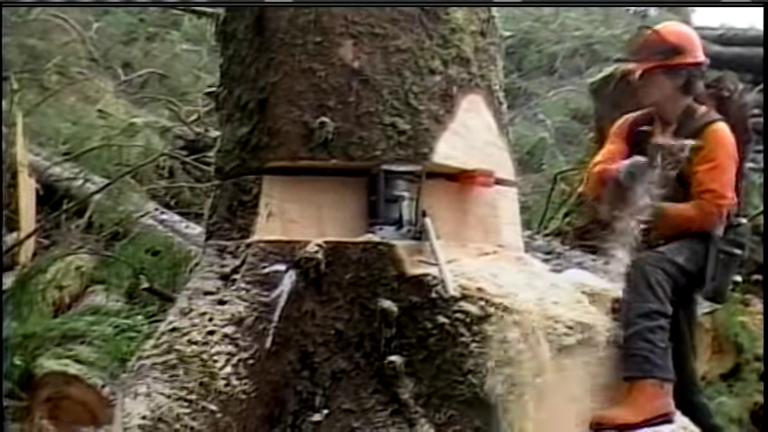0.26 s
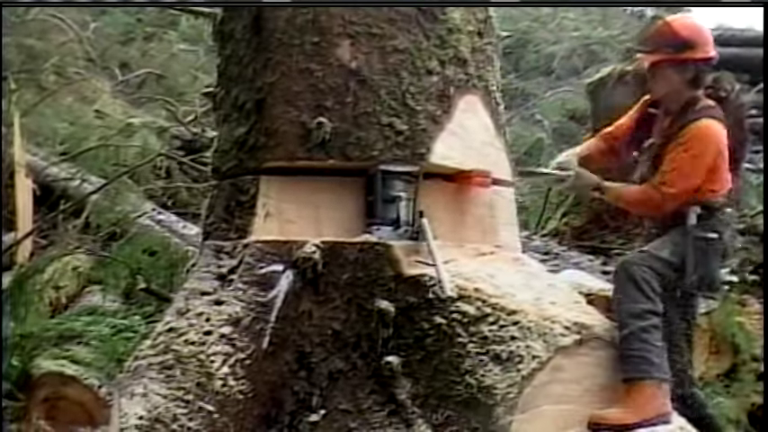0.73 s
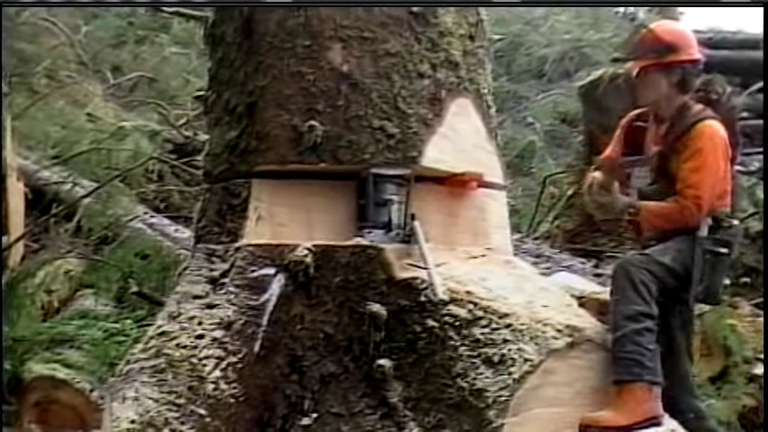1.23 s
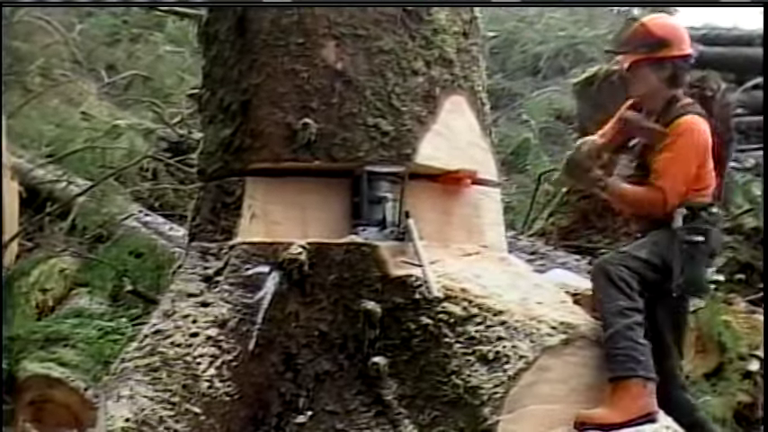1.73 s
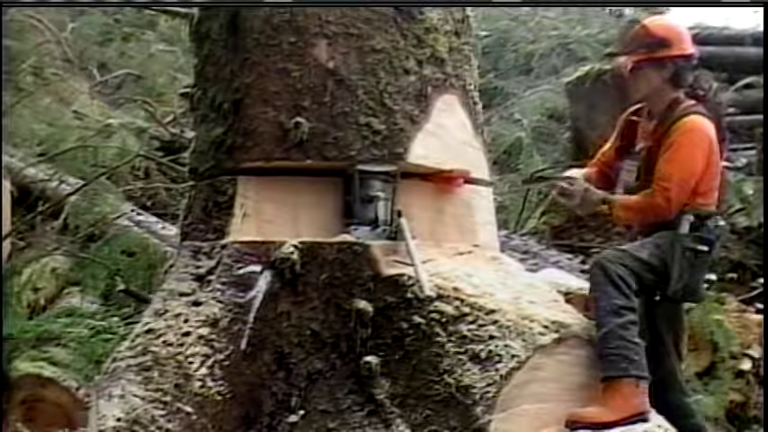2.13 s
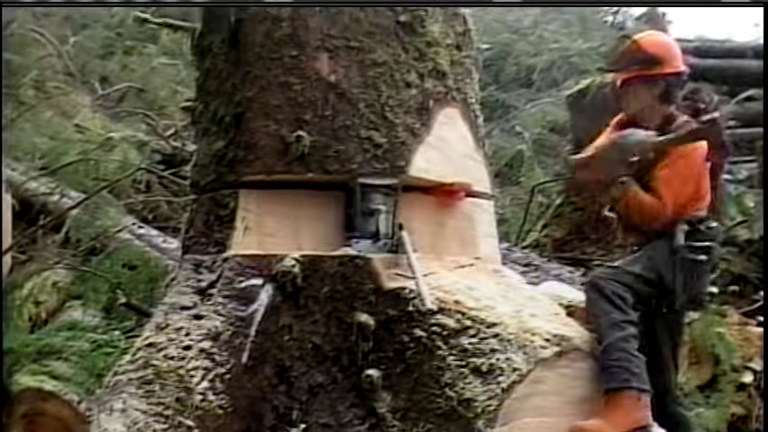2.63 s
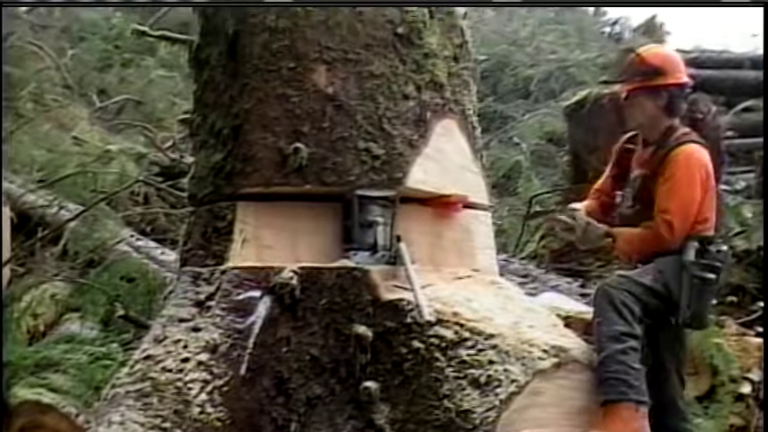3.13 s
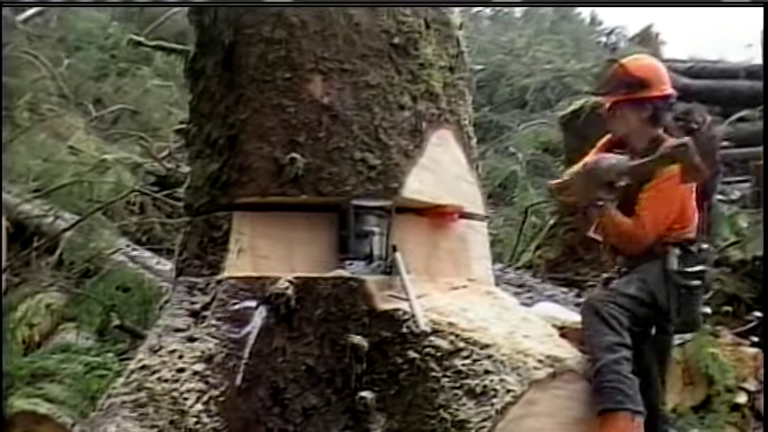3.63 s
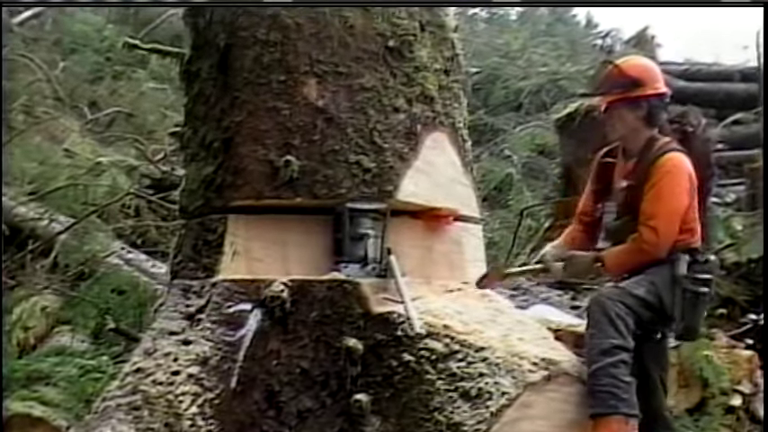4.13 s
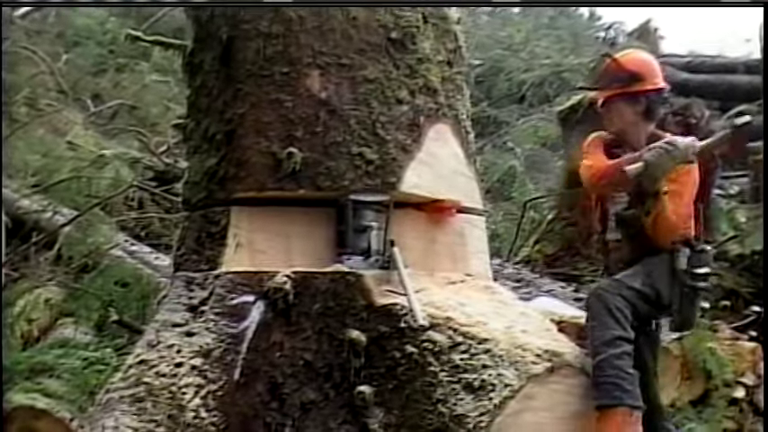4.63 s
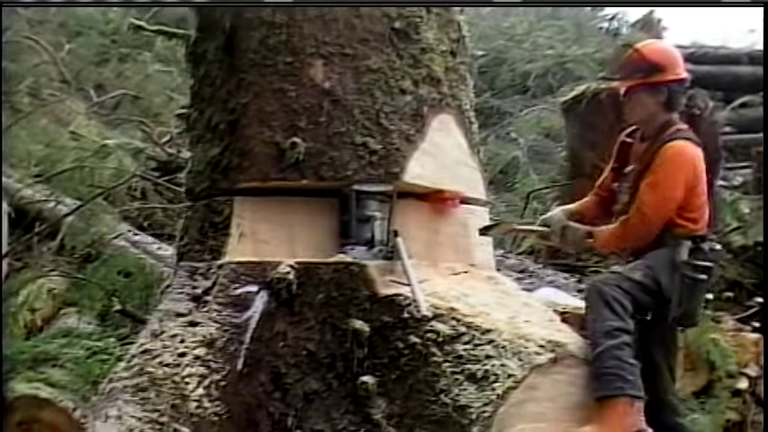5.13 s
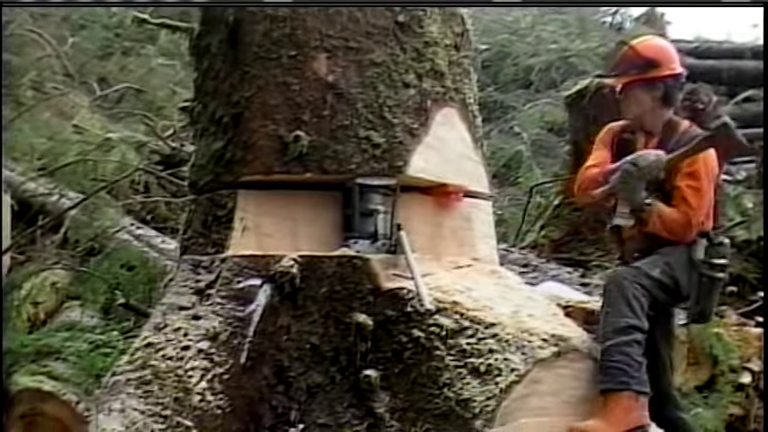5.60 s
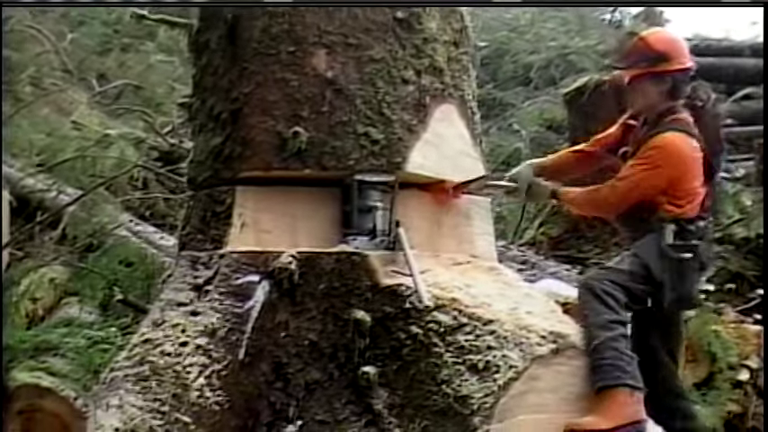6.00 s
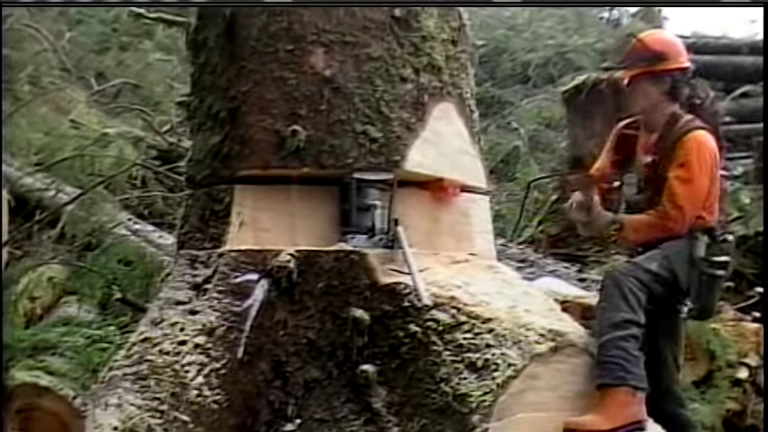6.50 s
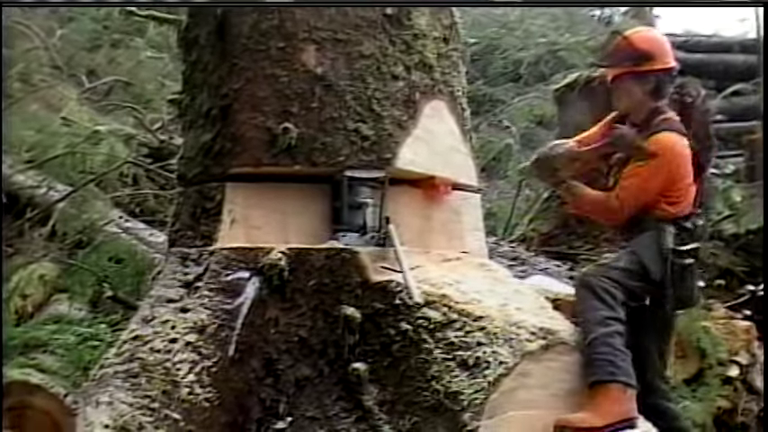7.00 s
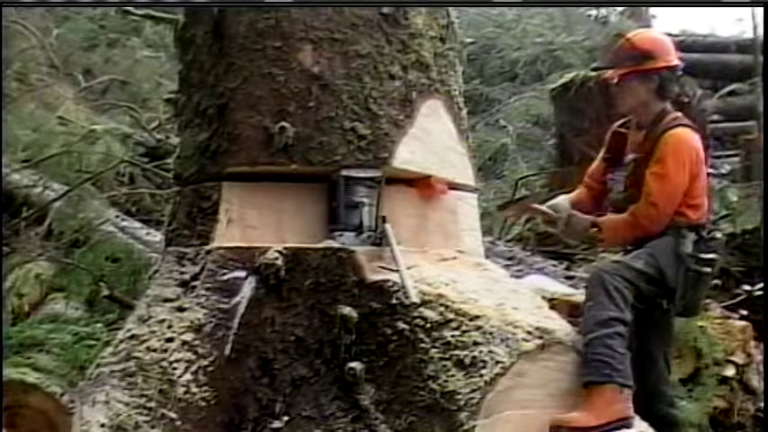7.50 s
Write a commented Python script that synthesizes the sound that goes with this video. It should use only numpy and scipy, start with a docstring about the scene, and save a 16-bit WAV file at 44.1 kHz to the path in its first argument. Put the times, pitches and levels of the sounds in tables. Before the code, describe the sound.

An axe strikes a wedge in a tree seven times, about once a second, each sharp, briefly ringing blow echoing through forest over faint hiss.

```python
"""Wedging a standing tree

An axe drives a wedge into a big tree, seven blows. Each impact excites damped modes of steel and wood,
and the forest scatters it back as a swelling wash. Gear and wood chips tick between the blows.
One microphone feeds the left track of a tape recorder, whose hiss, hum, whine and thumps lie on both."""
import sys
import numpy as np
from scipy import signal
from scipy.fft import rfft, irfft
from scipy.io import wavfile
from scipy.ndimage import uniform_filter1d

SR = 44100
rng = np.random.default_rng(int(sys.argv[2]) if len(sys.argv) > 2 else 0)


def transcribe(u):
    """Save the signal u as a 16-bit wav file named by the first command-line argument.

    u: samples, shape (n,) or (channels, n), limited to [-1, 1]; the rate is SR.
    q: integer samples, one column per channel.
    """
    v = np.clip(np.atleast_2d(u).T, -1, 1)
    q = np.round(v * 32767).astype(np.int16)
    wavfile.write(sys.argv[1], SR, q)


N = 341775


def gain_of(db):
    """Amplitude ratio of a level in decibels."""
    return 10 ** (np.asarray(db) / 20)


def spectrum_at(points, hz):
    """Interpolation of each column of a spectrum table over log frequency."""
    knots_hz, *columns = np.transpose(points)
    return np.array([np.interp(np.log(hz + 1), np.log(knots_hz + 1), column) for column in columns])


def add(mix, start_s, sound):
    """Superposition: a sound sums into the mix from start_s on."""
    part = mix[..., round(start_s * SR):][..., :sound.shape[-1]]
    part += sound[..., :part.shape[-1]]


def pulse(decay_s):
    """A heavily damped transient: one bump of peak 1 and a shallow overshoot."""
    u = np.arange(round(8 * decay_s * SR)) / (decay_s * SR)
    shape = u * np.exp(-u) * (1 - 0.37 * u)
    return shape / shape.max()


# Relative spectrum of forest air and tape noise: frequency_hz, left_db, right_db
HISS_SPECTRUM = [(10, -72, -70.5), (25, -73.5, -83), (49.5, -86.5, -89.5), (98, -88, -92), (239, -99, -100),
                 (497, -95, -113), (940, -94, -123), (1800, -96, -126), (4560, -100, -127),
                 (5800, -101, -126), (8800, -102, -124), (9950, -106, -127), (13200, -108, -126),
                 (15300, -108, -123), (15600, -107, -112), (15780, -106, -108), (15900, -122, -125),
                 (16400, -135, -138)]
# Likeness of the two tracks: frequency_hz, correlation
HISS_CORRELATION = [(30, 0.73), (130, 0.25), (300, 0.23), (600, 0)]


def hiss():
    """Partial coherence: air and tape noise whose bass fluctuates and is partly shared by the tracks."""
    frames, hz = N // 512 + 5, np.fft.rfftfreq(2048, 1 / SR)
    a, b, c, d = rng.standard_normal((frames, 1025, 4)).T
    correlation = spectrum_at(HISS_CORRELATION, hz).T
    left = a + 1j * b
    right = correlation * left + np.sqrt(1 - correlation ** 2) * (c + 1j * d)
    bass_drift_db = 2.1 * uniform_filter1d(rng.standard_normal(frames), size=4) * (hz < 90)[:, None]
    level_db = spectrum_at(HISS_SPECTRUM, hz)[:, :, None] + bass_drift_db + 15.5
    spectra = np.array([left, right]) * gain_of(level_db)
    return signal.istft(spectra, nperseg=2048, noverlap=1536)[1][:, :N]


FRAME_HZ = 29.9695


def frame_harmonic(number, left_db, right_db):
    """A pure tone phase-locked to the recorder's frame rate, at an rms level for each track."""
    t = np.arange(N) / SR - .0065
    return np.sqrt(2) * gain_of([[left_db], [right_db]]) * np.cos(2 * np.pi * number * FRAME_HZ * t)


# Partials of the recorder's hum: harmonic_number, left_db, right_db
HUM_PARTIALS = [(1, -78, -72), (2, -68, -71), (3, -71, -86), (4, -73, -74), (5, -101, -81), (6, -67, -79.5),
                (8, -75, -82.5), (9, -82.5, -94), (10, -83, -87.5), (11, -105, -96), (12, -78.5, -93),
                (14, -78, -94), (18, -78.5, -99), (20, -89, -100), (22, -88, -103), (24, -92, -105),
                (28, -91, -110)]


def hum():
    """Fourier synthesis: harmonics in phase sum to a train of downward pulses."""
    return -sum(frame_harmonic(*partial) for partial in HUM_PARTIALS)


# The line-scan tone, then its nearest sidebands going down: relative_level_db
WHINE_LEVELS = [-69, -85, -89, -84, -83, -104, -89]


def whine():
    """Sidebands: below the line-scan tone lies a comb of fainter tones, twice the frame rate apart."""
    near = [(525 - 2 * i, db) for i, db in enumerate(WHINE_LEVELS)]
    far = [(511 - 2 * i, -100 - 0.3 * i) for i in range(40)]
    return sum(frame_harmonic(number, db - 5, db + 0.5) for number, db in near + far)


# The recorder's stronger thumps: start_s, left_db, right_db, polarity
TAPE_THUMPS = [(0.584, -41.5, -62, 1), (0.85, -42, -43, 1), (2.69, -40.5, -58, -1), (2.781, -44, -41.5, 1),
               (4.656, -41.5, -65, -1), (4.763, -42.5, -43.5, 1), (6.613, -42, -64, -1),
               (6.828, -40.5, -42, 1), (7.613, -41, -58, -1)]


def thumps(first_beat_s=.043, beat_period_s=.5005, beat_db=-52.5):
    """Slow pulses hold mostly bass: a faint regular beat, with stronger thumps among it."""
    out = np.zeros((2, N))
    for start_s in np.arange(first_beat_s, N / SR, beat_period_s):
        add(out, start_s, gain_of(beat_db) * pulse(decay_s=0.0085))
    for start_s, left_db, right_db, polarity in TAPE_THUMPS:
        add(out, start_s, polarity * gain_of([[left_db], [right_db]]) * pulse(decay_s=0.0075))
    return out


def tick(level_db, centre_hz, q):
    """Damped resonance: a small impact gives a puff of band noise, lasting longer the lower it is."""
    t = np.arange(1500) / SR
    b, a = signal.iirpeak(centre_hz, q, SR)
    puff = signal.lfilter(b, a, signal.lfilter(b, a, rng.standard_normal(len(t))))
    t60_s = 0.013 + 22 / centre_hz
    attack = np.minimum(t / 0.00073, 1)
    return puff / puff.std() * attack * gain_of(level_db - 60 * t / t60_s)


# Small impacts of gear and wood chips: start_s, level_db, centre_hz
GEAR_TICKS = [(0.195, -45, 8840), (0.219, -45, 8820), (0.268, -43.5, 1400), (0.271, -39.5, 6850),
              (.334, -45.5, 410), (0.671, -50, 8910), (1.017, -43, 2520), (2.8935, -47, 3300),
              (2.968, -45, 2760), (3.1043, -42, 3110), (4.0001, -35.5, 4400), (4.077, -43, 5500),
              (4.091, -44, 4000), (4.5634, -45, 3260), (5.0712, -43, 5840), (5.201, -41, 4640),
              (5.231, -39.5, 2970), (6.0555, -33, 6850), (6.113, -44, 8130), (6.135, -46, 8340),
              (6.1594, -47, 8150), (6.3094, -42, 3370), (6.33, -42, 3730), (6.3444, -47, 7140),
              (6.377, -36, 8000), (7.197, -46, 6550), (7.4, -33, 6100), (7.425, -39.5, 4000),
              (7.44, -46, 6500)]


def gear_and_chips(faint_ticks_per_s=36):
    """Impact noise: distinct ticks over a random scatter of faint, bright ones."""
    out = np.zeros(N)
    for start_s, level_db, centre_hz in GEAR_TICKS:
        add(out, start_s, tick(level_db, centre_hz, q=0.73))
    for when, faintness, pitch in rng.random((round(faint_ticks_per_s * N / SR), 3)):
        add(out, when * N / SR, tick(-50 - 8 * faintness, 6000 + 3000 * pitch, q=3.0))
    return signal.lfilter(*signal.butter(2, 10500, fs=SR), out)


BLOW_SAMPLES, CONTACT_S = 4096, .0012
# Relative spectrum of steel meeting wedge: frequency_hz, level_db
CRACK_SPECTRUM = [(200, -85), (600, -7.5), (1500, -10), (3500, -13), (5500, 5), (8000, 10), (9800, -5),
                  (13000, -17), (16500, -42)]


def crack(level_db, rise_s=.0012, t60_s=.015):
    """A brief contact has a broad spectrum: a burst of noise as the steel meets the wedge."""
    colour_db = spectrum_at(CRACK_SPECTRUM, np.fft.rfftfreq(BLOW_SAMPLES, 1 / SR))[0]
    noise = irfft(rfft(rng.standard_normal(BLOW_SAMPLES)) * gain_of(colour_db))
    age = np.maximum(np.arange(BLOW_SAMPLES) / SR - CONTACT_S, 0)
    return noise / noise.std() * np.minimum(age / rise_s, 1) * gain_of(level_db - 60 * age / t60_s)


# Modes of axe head, wedge and trunk:
# pitch_hz, t60_s, close_width_hz, forest_width_hz, close_level_db, forest_level_db
MODES = [(400, 0.025, 41, 100, -35, -91), (533, 0.016, 90, 138, -19, -77),
         (743, 0.045, 50, 120, -17.5, -72.5), (900, 0.022, 14, 91, -31, -72.5),
         (1065, 0.039, 23, 294, -20, -73.5), (1532, 0.03, 230, 570, -21.5, -73),
         (1798, 0.021, 300, 470, -18.5, -76.5), (2100, 0.0099, 120, 680, -25, -83),
         (2816, 0.026, 330, 490, -22.5, -80.5), (3367, 0.021, 490, 900, -17, -80.5),
         (4730, 0.044, 1300, 2100, -26.5, -86), (6435, 0.074, 400, 1500, -30.5, -86),
         (7280, 0.0073, 700, 660, -40, -85), (8510, 0.024, 910, 1200, -25, -86.5)]
# For each mode, 1 if it belongs to the steel head: is_steel
STEEL_MODES = [0, 0, 0, 0, 0, 1, 1, 1, 0, 1, 0, 1, 0, 1]


def ring(pitch_hz, level_db, sharpness):
    """Free vibration: each mode decays exponentially while a wandering phase broadens its line."""
    t, hz = np.arange(BLOW_SAMPLES) / SR, pitch_hz[:, None]
    t60_s, width_hz = np.transpose(MODES)[1:3, :, None]
    age = np.maximum(t - CONTACT_S * np.sqrt(hz / 8000), 0)  # the low modes start first
    wander = np.sqrt(2 * np.pi * width_hz / sharpness / SR) * rng.standard_normal(age.shape)
    phase = 2 * np.pi * hz * age + np.cumsum(wander * (age > 0), axis=1)
    attack = 1 - np.exp(-age / 0.00063)
    return -(gain_of(level_db[:, None] - 60 * age / t60_s) * attack * np.sin(phase)).sum(0)


def excite_modes(ring_db, tilt_db_per_octave, *favoured_modes):
    """Modal excitation: where and how squarely the steel lands sets which modes ring out."""
    hz, *_, close_db, forest_db = np.transpose(MODES)
    pitch_hz, favour_db = hz.copy(), np.zeros(len(hz))
    for mode_hz, boost_db in np.reshape(favoured_modes, (-1, 2)):
        nearest = np.argmin(abs(np.log(hz / mode_hz)))
        pitch_hz[nearest], favour_db[nearest] = mode_hz, boost_db
    lift_db = ring_db + tilt_db_per_octave * np.log2(hz / 1500) + favour_db
    close_lift_db = 0.91 * lift_db + 0.34 * favour_db  # single modes stand out more close by
    sharpness = np.exp(.11 * favour_db * STEEL_MODES)[:, None]  # steel that rings out keeps its pitch
    return pitch_hz, close_db + close_lift_db, forest_db + lift_db, sharpness


# Echoes from ground, near trunks and far slopes, each at 700 Hz and 7000 Hz: level_db, slope_db_per_s
ECHO_DECAYS = [
    [(16.5, -1400), (10, -500)],
    [(7, -37.5), (9, -56.5)],
    [(-7.5, -13.5), (-16.5, -14.5)],
]
# Broadband part of the echoes: frequency_hz, relative_level_db
FOLIAGE_SPECTRUM = [(150, -22), (350, -15), (700, -3), (1300, -2), (2300, -13.5), (4000, -14),
                    (6000, -18.5), (8800, -20), (10000, -27), (16000, -44)]
# Denser stands of trees: delay_s, boost_db, spread_s
TREE_STANDS = [(0.044, 1.5, 0.008), (0.122, 0.5, 0.033), (.3, 1.5, .035)]


def forest_echo(pitch_hz, level_db, sharpness, swell_s=0.18):
    """Scattering: a wash in the colour of the ring swells as more trunks answer; treble fades first."""
    hz, t, noise = signal.stft(rng.standard_normal(round(1.2 * SR)), SR, nperseg=1024, noverlap=896)
    width_hz = np.transpose(MODES)[3, :, None] / sharpness
    detuning = (hz - pitch_hz[:, None]) / width_hz
    mode_power = np.sqrt(sharpness) * gain_of(level_db[:, None]) ** 2 / (1 + 2 * detuning ** 2) ** 2
    foliage_power = gain_of(np.mean(level_db[:7]) + spectrum_at(FOLIAGE_SPECTRUM, hz)[0]) ** 2
    colour = np.sqrt((mode_power.sum(0) + foliage_power) * SR / 2)[:, None]
    ground, trunks, slopes = [gain_of(row[:, :1] + row[:, 1:] * t) ** 2 for row in np.array(ECHO_DECAYS)]
    swell = 1 - np.exp(-(t / swell_s) ** 2.02)  # trunks and slopes answer later than the ground
    low_db, high_db = 10 * np.log10(ground + swell * (trunks + slopes) + 1e-12)
    decades = np.clip(np.log10((hz + 1) / 700), -.3, 1.2)[:, None]
    envelope_db = (1 - decades) * low_db + decades * high_db
    for delay_s, boost_db, spread_s in TREE_STANDS:
        envelope_db += boost_db * np.exp(-((t - delay_s) / spread_s) ** 2)
    wash = signal.istft(noise * colour * gain_of(envelope_db), SR, nperseg=1024, noverlap=896)[1]
    return wash * np.minimum(np.arange(len(wash)) / SR / 0.012, 1)


# Blows on the wedge: start_s, crack_db, push_db, ring_db, tilt_db_per_octave,
# then for each of four favoured modes: pitch_hz, boost_db
AXE_BLOWS = [(1.171, -8, -35, -3.5, 1, 1585, 11.3, 2330, 10, 3314, 5.1, 4664, 7.4),
             (2.2273, -10.5, -31, -4, -1.05, 1744, 7.9, 3480, 6.6, 8680, 7.9, 730, 1.9),
             (3.1579, -8.5, -45, -0.76, 0.25, 1793, 6.1, 3540, 2, 840, 3, 7340, 1.5),
             (4.1464, -12, -43, -0.6, -0.3, 1044, 3.4, 1770, 6.5, 6480, 6.1, 754, 1.9),
             (5.2698, -10, -39, 2, -0.6, 1048, 2.8, 3610, 3.9, 8530, 3.1, 2150, 5.7),
             (6.395, -13.5, -36, 1.5, -0.96, 936, 8, 2885, 8.1, 1550, 2.6, 561, 2.3),
             (7.4863, -12.5, -44, 1, -1.5, 1198, 1.6667, 1468, 4.5, 2830, 2.6, 764, 1.2)]


def axe():
    """Impulse response: each blow gives a crack and ring, a low push through the trunk, then echoes."""
    out = np.zeros(N)
    for start_s, crack_db, push_db, *landing in AXE_BLOWS:
        pitch_hz, close_db, forest_db, sharpness = excite_modes(*landing)
        add(out, start_s - CONTACT_S, crack(crack_db) + ring(pitch_hz, close_db, sharpness))
        add(out, start_s + 0.0029, -gain_of(push_db) * pulse(decay_s=0.0032))
        add(out, start_s + .003, forest_echo(pitch_hz, forest_db, sharpness))
    return out


def scene():
    """Crosstalk: the microphone's treble leaks from left to right; the recorder's noises lie on both."""
    microphone = axe() + gear_and_chips()
    leak = gain_of(-35.5) * signal.lfilter(*signal.butter(1, 5000, "high", fs=SR), microphone)
    return np.array([microphone, leak]) + hiss() + hum() + whine() + thumps()


def record(dry):
    """Band limiting: a steep linear-phase low-pass at 16.5 kHz."""
    lowpass = signal.firwin(511, 16500, window=("kaiser", 9), fs=SR)
    return signal.oaconvolve(dry, lowpass[None], "same")


dry = scene()
out = record(dry)
transcribe(out)
```